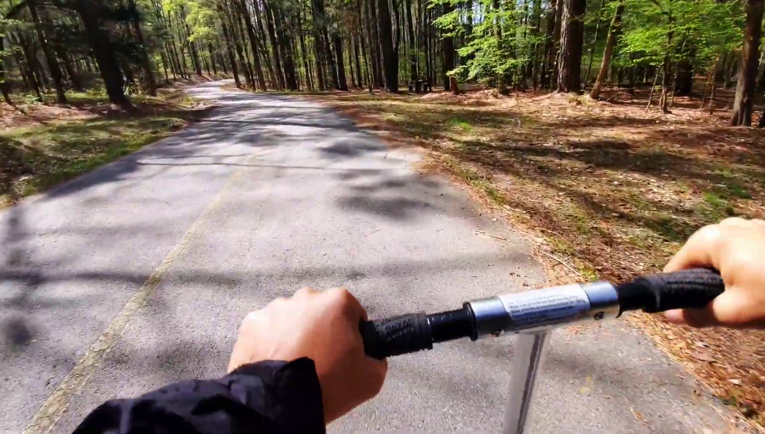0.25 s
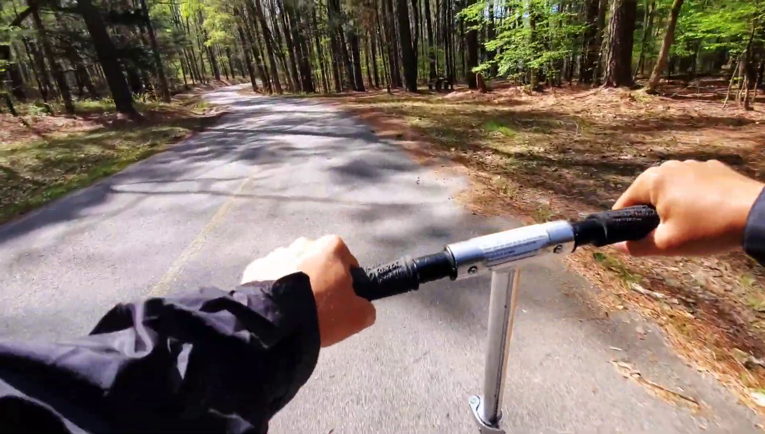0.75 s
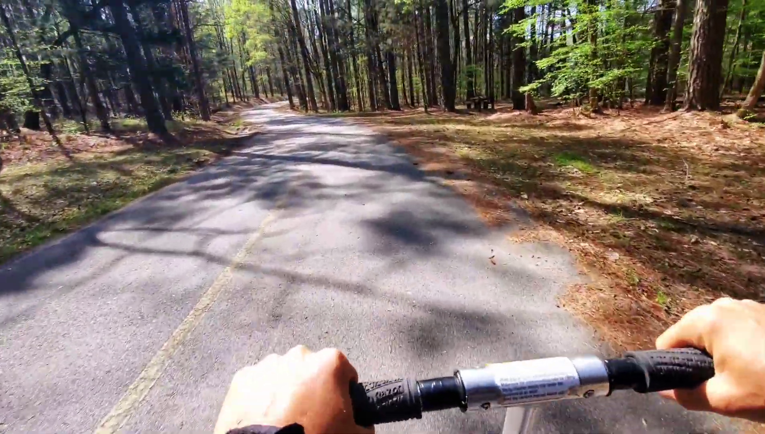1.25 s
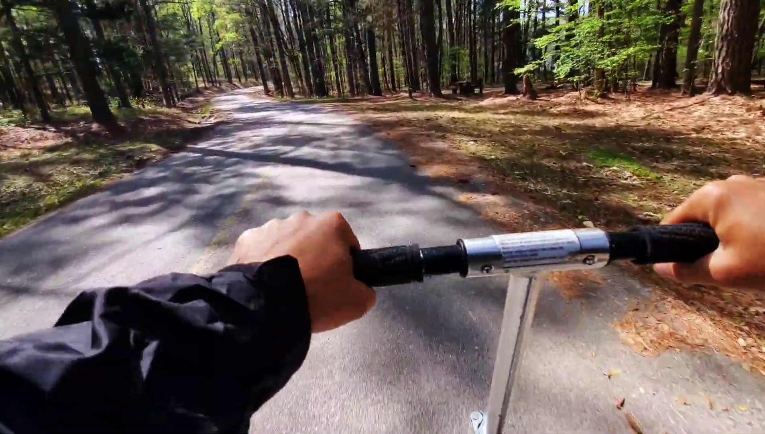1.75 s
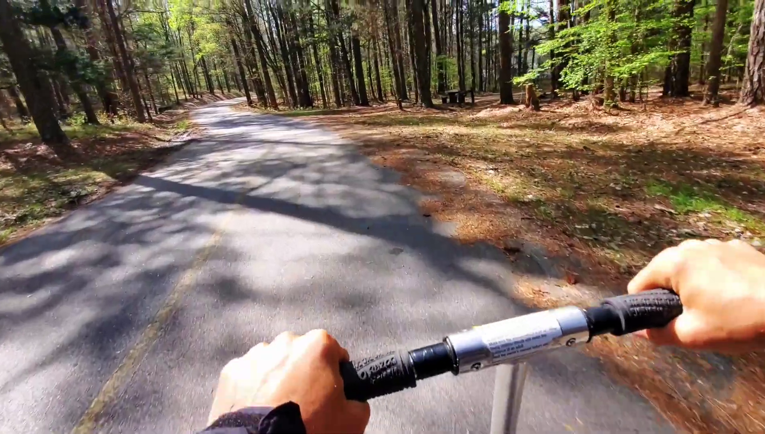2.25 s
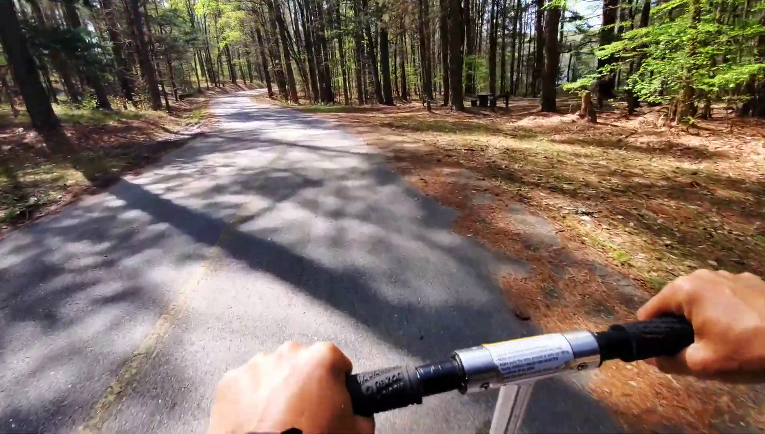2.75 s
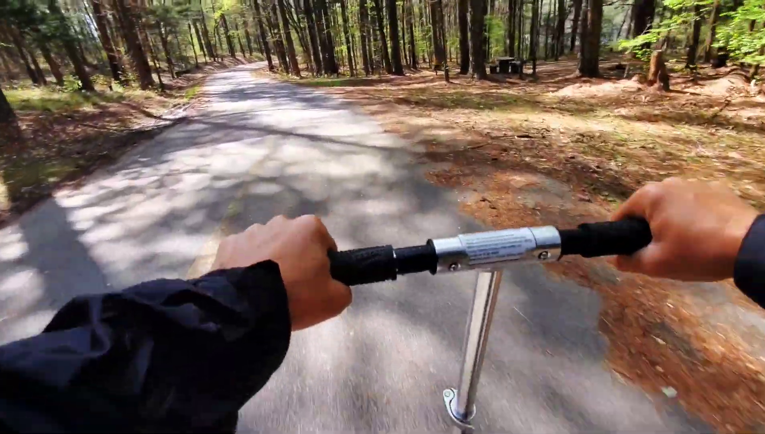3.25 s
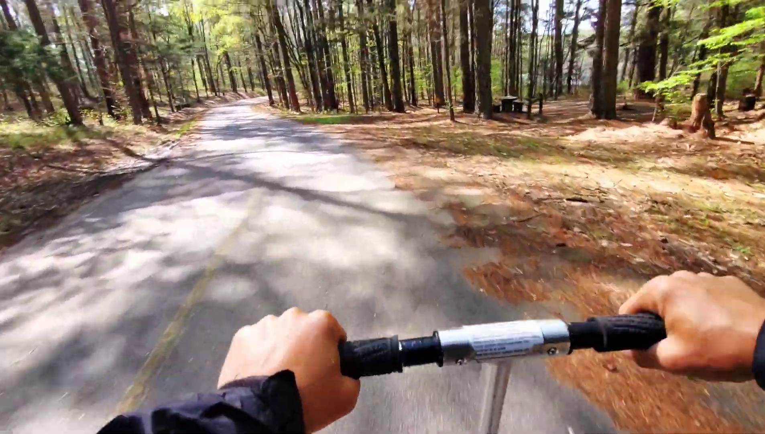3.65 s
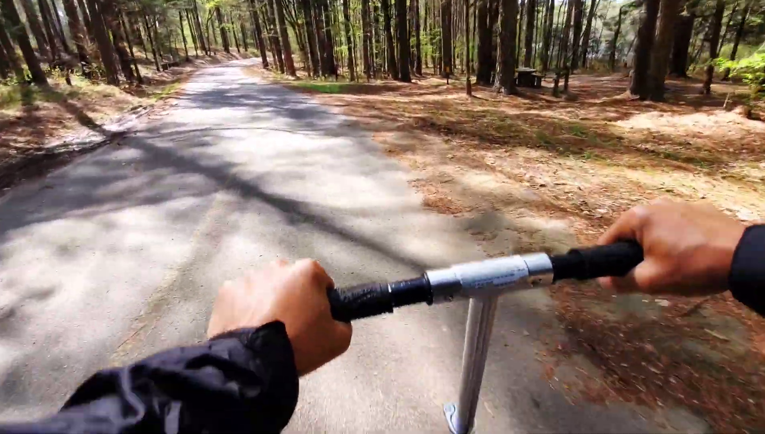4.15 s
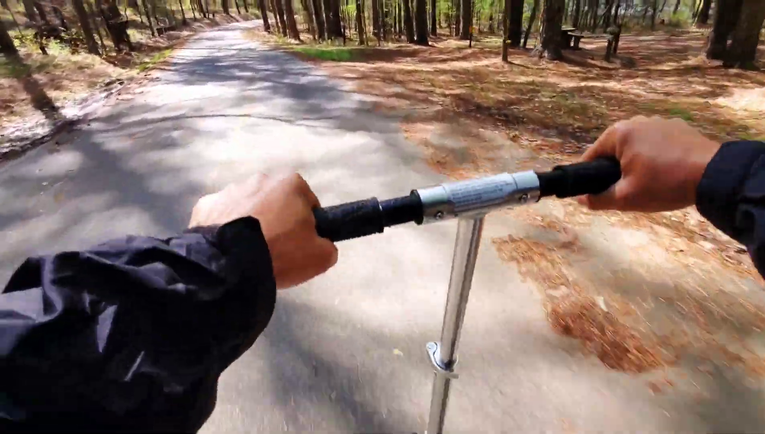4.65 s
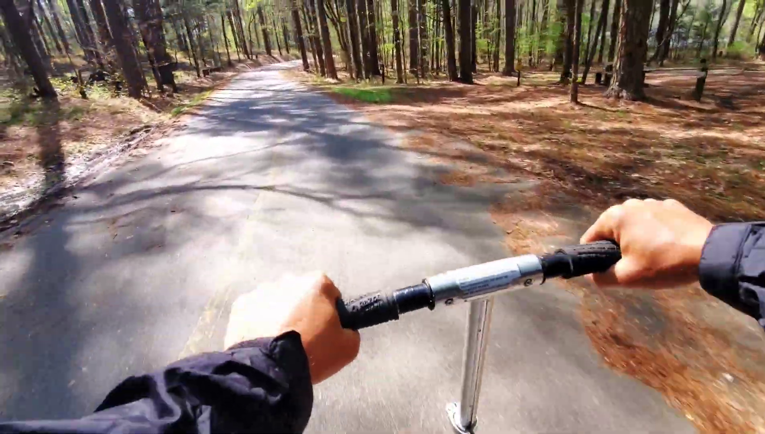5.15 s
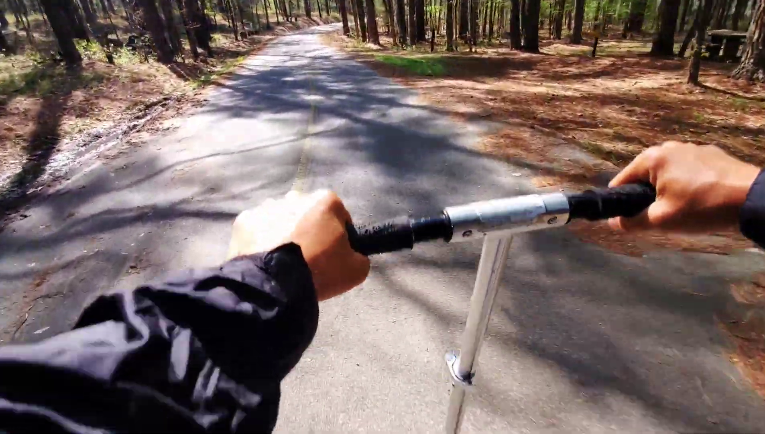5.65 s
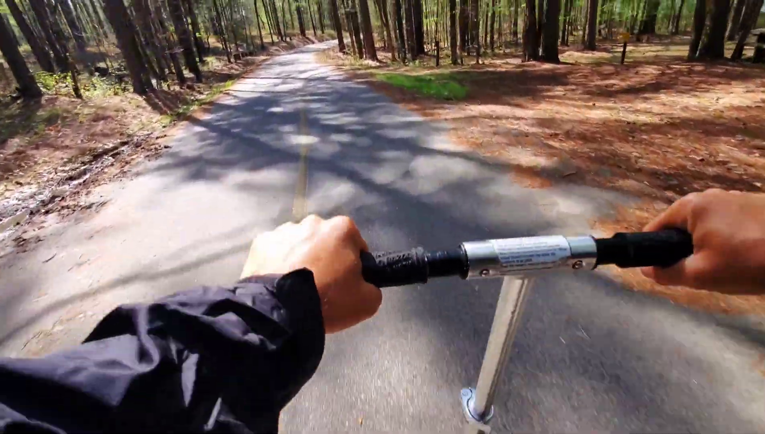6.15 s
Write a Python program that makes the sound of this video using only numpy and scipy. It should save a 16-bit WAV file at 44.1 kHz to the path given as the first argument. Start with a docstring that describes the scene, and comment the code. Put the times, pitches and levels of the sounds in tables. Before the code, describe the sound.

A small-wheeled kick scooter rolls along a paved forest path for about six and a half seconds, heard close from the rider's chest. A low deck rumble and wheel hum run throughout, growing gradually louder. A shoe crunches and scrapes on the asphalt at about 0.3, 1.6, 2.9, 4.3 and 5.7 seconds; each push briefly lightens the deep rumble and swells the wheel hum. The loose stem gives two sharp metallic clacks at 0.6 and 0.7 seconds, the loudest sounds, and a much softer one near 5.8. Grit and twigs tick irregularly all along, with brighter snaps around 1, 4.4 and 6 seconds. Dips make soft low thuds, mostly between 1 and 3 seconds, and stones knock dully against the wheels from about 2.2 seconds on. The rider's jacket rustles in short, quiet swells over a faint hiss.

```python
"""A small-wheeled kick scooter rolls along a forest asphalt path, heard from two microphone ports on the chest.
Road grain shakes the deck and rings frame and wheels; stones knock the wheels, dips bounce the deck.
Each kick scuffs, unloads the deck and adds speed. A loose stem joint clacks, grit and twigs tick,
and the rider's jacket rustles over a faint hiss."""
import sys
import numpy as np
from scipy import signal
from scipy.fft import rfft, irfft
from scipy.io import wavfile
from scipy.ndimage import uniform_filter1d

SR = 44100
rng = np.random.default_rng(int(sys.argv[2]) if len(sys.argv) > 2 else 0)


def dump_mix(stems):
    """Bounce the given channels to the path in sys.argv[1] as a 16-bit WAV at rate SR."""
    frames = np.atleast_2d(stems).T  # one column per channel
    limited = np.clip(frames, -1, 1)  # hard clip at full scale
    pcm = np.round(limited * 32767).astype(np.int16)
    wavfile.write(sys.argv[1], SR, pcm)


N = 282240


def undb(db):
    return 10 ** (np.asarray(db) / 20)


def unit(x):
    """Scale to rms 1."""
    return x / np.sqrt(np.mean(x ** 2))


def curves(table):
    """Columns of a time table, one value per sample."""
    time_s, *columns = np.transpose(table)
    return [np.interp(np.arange(N) / SR, time_s, column) for column in columns]


def over_hz(table, column):
    """A table column on the FFT bins, interpolated over log frequency."""
    hz = np.maximum(np.arange(N // 2 + 1) * SR / N, 1)
    return np.interp(np.log(hz), np.log(np.array(table)[:, 0]), np.array(table)[:, column])


def band(x, hz, width_hz):
    """One resonance, gain 1 at the centre."""
    return signal.lfilter(*signal.iirpeak(hz, hz / width_hz, fs=SR), x)


def ring(x, modes, apart_samples=0):
    """Sum of modes, each filtered twice for deep valleys and optionally fed its own stretch of x."""
    return sum(undb(db) * band(band(np.roll(x, k * apart_samples, axis=-1), hz, 1.59 * width),
                               hz, 1.94 * width)
               for k, (hz, width, db) in enumerate(modes))


def walk(rate_hz):
    """Random steps, smoothed twice."""
    hold = int(SR / rate_hz)
    steps = np.repeat(rng.standard_normal(N // hold + 1), hold)
    return uniform_filter1d(uniform_filter1d(steps, hold), hold)[:N]


def step(at_s, over_s):
    """Smooth change from 0 to 1."""
    return .5 + .5 * np.tanh((np.arange(N) / SR - at_s) / over_s)


def swell(peak_s, rise_s, fall_s):
    """Exponential rise and fall."""
    t = np.arange(N) / SR - peak_s
    return np.exp(-np.where(t < 0, -t / rise_s, t / fall_s))


def low_high(db, treble_db):
    """Gains of the low and the treble band, as two rows."""
    return np.vstack([undb(db), undb(db + treble_db)])


def add(out, start_s, sound, peak_db, pan_db):
    """Mix in a stereo event; pan_db is left minus right."""
    i = int(start_s * SR)
    sound = sound / np.abs(sound).max() * undb(peak_db + np.array([[pan_db], [-pan_db]]) / 2)
    out[:, i:i + sound.shape[1]] += sound[:, :N - i]


# microphone ports: freq_hz, coherence, pan_db
PORTS = [(60, 0.97, -3), (197, 0.95, -1), (656, 0.86, -2), (1180, 0.55, -5.5), (3040, 0.34, -4.5),
         (8400, 0, -1), (15000, 0.1, -4)]

def ports(pair):
    """Two independent strands become left and right: alike in the bass, unrelated in the treble."""
    coherence = np.clip(over_hz(PORTS, 1), 0, 1)
    tilt = undb(over_hz(PORTS, 2) / 2)
    mid, side = rfft(pair) * np.sqrt([1 + coherence, 1 - coherence])
    return irfft([(mid + side) * tilt, (mid - side) / tilt], N) / np.sqrt(2)


# background hiss: time_s, level_db, treble_rel_db
HISS = [(0, -56, -3), (.25, -58, -3.5), (.8, -57, 0), (1.1, -53, -5), (1.45, -55.5, -4), (2.1, -51.5, -4.5),
        (2.7, -52.5, -3), (3.3, -49, -9.5), (3.95, -58.5, 0.5), (4.17, -54, -16), (4.6, -44.5, -13),
        (5.0, -50.5, -6.5), (5.62, -53.5, -9), (5.9, -45.5, -10), (6.2, -50, -12), (6.4, -50, -3)]

def hiss_envelope():
    """Grit and jacket hiss under everything."""
    return low_high(*curves(HISS))


# jacket rustles: peak_s, level_db, treble_rel_db, swell_s
RUSTLES = [(.45, -47.5, 2, 0.021), (.75, -47.5, -7, 0.04), (.97, -52, 0, 0.047), (1.17, -52.5, -5, .04),
           (1.36, -50, -4, 0.038), (1.58, -45.5, -11, 0.03), (2.5, -52.5, -10, 0.1),
           (3.2, -43.5, -2, 0.057), (3.44, -47, -9, 0.039), (3.66, -48, -17, 0.034), (3.81, -48, -4, 0.17),
           (4.77, -51, 0, 0.031), (5.98, -46.5, 1, 0.055)]

def rustle_envelope():
    """The jacket rubs in short swells."""
    total = 0
    for peak_s, db, treble_db, swell_s in RUSTLES:
        total = np.hypot(total, low_high(db, treble_db) * swell(peak_s, swell_s, swell_s))
    return total


# kicks: land_s, back_on_deck_s, speed_gain_db, unload_db, crunch_db,
# scrape_peak_s, scrape_db, scrape_treble_rel_db, scrape_rise_s, scrape_fall_s
KICKS = [(0.318, 0.646, 8.5, -5, -44, 0.61, -43.5, -2, 0.11, 0.16),
         (1.633, 1.84, 7, -8, -49.5, 1.92, -43.5, -3.5, 0.21, 0.082),
         (2.911, 3.17, 6.5, -12.5, -42, 3.07, -39.5, 1.5, 0.035, 0.04),
         (4.256, 4.563, 5.5, -4, -44, 4.45, -39, -1, 0.096, 0.14),
         (5.722, 5.968, 3.5, -11, -50, 5.82, -41.5, -2.5, 0.075, 0.065)]

def shoe_envelope():
    """The shoe crunches on landing and scrapes through the push."""
    total = 0
    for land_s, _, _, _, crunch_db, peak_s, scrape_db, treble_db, rise_s, fall_s in KICKS:
        crunch = low_high(crunch_db, treble_db=-10) * swell(land_s + 0.03, rise_s=0.022, fall_s=0.15)
        scrape = low_high(scrape_db, treble_db) * swell(peak_s, rise_s, fall_s)
        total = np.hypot(total, np.hypot(crunch, scrape))
    return total


def ride(gather_db_per_s=1.7562, coast_s=0.38, unload_after_s=0.04, shift_s=0.0135):
    """Kicks add speed (wheel gain) that fades in coasting, and quieten the deck while the weight is off."""
    t = np.arange(N) / SR
    speed_db, unload_db = gather_db_per_s * t, 0
    for land_s, back_s, gain_db, drop_db, *_ in KICKS:
        push = np.clip((t - land_s) / (back_s - land_s), 0, 1)
        coast = np.exp(-np.maximum(t - back_s, 0) / coast_s)
        weight_off = step(land_s + unload_after_s, shift_s) * (1 - step(back_s, shift_s))
        speed_db += gain_db * push * coast
        unload_db += drop_db * weight_off
    return speed_db, unload_db


def crackle(per_s, spread_db, burst_s, share=0.44):
    """Even hiss with short bursts of grit, two strands."""
    size = np.minimum(rng.exponential(size=N), 3.5)
    hits = (rng.random(N) < per_s / SR) * undb(spread_db * size)
    bursts = signal.lfilter([1], [1, -np.exp(-1 / (burst_s * SR))], hits)
    return rng.standard_normal((2, N)) * (1 + share * unit(bursts))


# rubbing spectrum: freq_hz, density_db
RUB_SPECTRUM = [(900, -2.5), (1500, 0.5), (2200, 2), (3200, -2), (4000, -4.5), (5200, -5.5), (7000, -12),
                (9000, -12.5), (12000, -15.5), (16000, -19)]

def rubbing():
    """Hiss, jacket and shoe drive a fluttering friction noise; its two bands crackle separately."""
    low_gain, high_gain = np.sqrt(hiss_envelope() ** 2 + rustle_envelope() ** 2 + shoe_envelope() ** 2)
    treble = over_hz([(3500, 0.14), (7000, 0.95)], 1)
    colour = undb(over_hz(RUB_SPECTRUM, 1))
    flutter_db = 1.25 * walk(35)
    low = irfft(rfft(crackle(per_s=220, spread_db=3.5, burst_s=0.0017)) * colour * (1 - treble), N)
    high = irfft(rfft(crackle(per_s=130, spread_db=5.5, burst_s=0.0013)) * colour * treble, N)
    low = unit(low) * low_gain * undb(0.42 * walk(45))
    high = unit(high) * high_gain * undb(0.69 * walk(40))
    return ports((low + high) * undb(flutter_db))


# grit and twigs, plus a small stem-joint knock at 1.03 s (three rows): start_s, peak_db, snap_db, body_hz,
# fall_ms, pan_db
TICKS = [(0.1707, -38.5, -10, 5000, 1.5, -16), (0.199, -30, -27, 5670, 1.5, -8),
         (.3162, -43, -39, 5800, 4, -7.5), (.334, -30.5, -28, 2500, 1.5, -4),
         (.341, -31, -28, 2200, 2.1, -5), (0.35, -31, -34, 2550, 3.8, -4), (.36, -32, -30, 3080, 2.5, -2),
         (.377, -41, -25, 3000, 2, -5), (0.396, -34, -25, 3300, 1.5, -5),
         (.4125, -35, -18, 3450, 1.5, -5.5), (0.4522, -27.5, -24, 2550, 4.7, -6),
         (0.5114, -23.5, -22, 1500, 0.54, 0), (0.523, -29, -17, 1710, 2, -3),
         (0.5378, -22.5, -14, 2100, .6, -1), (.558, -22.5, -15, 990, 1.1, -2),
         (1.03, -21.5, -39, 3230, 2.2, -8), (1.0308, -26, -36, 2140, 2.8, -6),
         (1.0325, -26.5, -36, 1190, 2.6, -6), (1.179, -36, -8, 3180, 1.7, -6),
         (1.3414, -31.5, -19, 2960, 5.7, -8), (1.366, -35.5, -18, 4370, 2.8, -11),
         (1.471, -36, -11, 5000, 2.2, -8), (1.5845, -29.5, -24, 5600, 2, -12),
         (1.59, -28, -22, 2900, 2.7, -12), (1.708, -28, -26, 2690, 6.5, -3.5),
         (1.803, -30, -23, 2500, 1, -1), (1.847, -29.5, -18, 3000, 3.9, -10),
         (1.886, -30, -15, 4500, 1, -10), (1.909, -29, -2, 7000, 1, -10),
         (2.019, -27.5, -20, 3040, 2.7, -8), (2.1236, -38, -25, 3200, 3, 0),
         (2.364, -32, -19, 3300, 2.3, -8), (2.408, -37, -26, 2700, 4, -6),
         (2.4653, -30.5, -11, 4600, 2.3, -7), (2.6363, -31, -1, 2940, 2.5, -6),
         (2.7614, -34.5, -10, 3200, 1.3, -16), (2.947, -32, -24, 2560, 5.9, -6),
         (2.968, -30, -21, 2800, 3.4, 0), (3.017, -31.5, -15, 4500, 3.3, 3), (3.048, -26, -20, 2000, 2, -2),
         (3.064, -23.5, -14, 3500, 8.4, -1), (3.088, -29, -10, 4500, 6, -6),
         (3.1584, -29, -27, 2770, 4.2, -8), (3.192, -33, -10, 2890, 4, -11),
         (3.235, -31, -16, 3500, 4, -11), (3.3344, -36, -32, 3810, 1.9, -13),
         (3.3762, -32, -14, 4030, 4.1, -7), (3.453, -38, -20, 4170, 3, -8),
         (3.54, -38, -11, 4000, 1.6, -11), (3.6166, -37, -18, 4500, 1.7, -9),
         (3.7564, -40, -23, 5000, 1.7, -16), (3.7828, -33, -6, 5400, 3, -9), (3.807, -35, -12, 3500, 4, -6),
         (3.89, -32, -16, 2770, 1.3, -6), (4.294, -32, -25, 2700, 5.4, -4), (4.4376, -19.5, -8, 4000, 4, 1),
         (4.454, -25, -17, 3030, 3.4, -5), (4.4812, -29, -21, 2620, 3, -6), (4.489, -24, -13, 5500, 2, -8),
         (4.6444, -37, -19, 5000, 2, -4), (4.6788, -32, -18, 3000, 2, -8), (4.701, -35, 5, 2710, 1.5, -10),
         (4.763, -29.5, -22, 5030, 4, -11), (4.82, -31, -27, 4040, 5.4, -1),
         (4.89, -33, -11, 3290, 1.7, -18), (4.9155, -37, -28, 5500, 2, -12),
         (5.026, -40.5, -15, 6470, 1.5, -11), (5.0744, -41, -8, 4500, 3, -2.5),
         (5.1228, -35.5, -25, 4500, 3, -3.5), (5.315, -39, -13, 6500, 2, -6),
         (5.3732, -42.5, -10, 6500, 1.9, -8), (5.4106, -40, -5, 6500, 1.5, -12),
         (5.43, -38.5, -8, 5200, 1.3, -8), (5.81, -39, -17, 3050, 5, -4), (5.978, -26, -9, 5500, 1.7, -8),
         (5.989, -18.5, -14, 5000, 2.8, -14), (6.005, -31, -15, 5650, 2, -8),
         (6.0876, -36, -7, 5000, 2, -9), (6.191, -38, -3, 7000, 2, -12), (6.344, -30, -24, 6000, 1.7, -8.5)]

def ticks(faint_count=12, shared_gain=1.4, click=1.8):
    """Grit and twigs snap under wheel and shoe, and the stem joint knocks once softly at 1.03 s: each is a
    click with a dull body and a quicker bright snap."""
    out, t = np.zeros((2, N)), np.arange(1200) / SR
    faint = [(when * (N - 1) / SR, -44 + 6 * level, -16 + 14 * top,
              3000 * 2 ** (pitch - .5), 2.8, -7.5 + 7 * pan)
             for when, level, top, pitch, pan in rng.random((faint_count, 5))]
    for start_s, peak_db, snap_db, hz, fall_ms, pan_db in TICKS + faint:
        fall_s = max(fall_ms, .3) / 1000
        rise_s = .25 * fall_s
        noise = rng.standard_normal((2, 3, len(t))) * np.minimum(t / rise_s, 1)
        noise = noise[:, :2] + shared_gain * noise[:, 2:]  # partly alike at both ports
        noise[:, :, int(rise_s * SR)] += click
        body = band(band(noise[0] * np.exp(-t / fall_s), hz, 0.39 * hz), hz, 2.1 * hz)
        snap = band(band(noise[1] * np.exp(-t / (0.62 * fall_s)), 12000, 6900), 16400, 7200)
        add(out, start_s, unit(body) + 2.55 * undb(snap_db) * unit(snap), peak_db, pan_db)
    return out


# stem joint modes: freq_hz, level_db, t60_s
JOINT_MODES = [(650, -15, .045), (870, -11.5, .045), (1030, -9.5, .045), (1400, -4, .03), (1470, -8, .022),
               (1760, -13, .02), (2680, -10, .025), (2870, -4.5, .04), (3010, -6, .022), (3250, -5, .022),
               (3780, -1, .025), (4700, -8, .045), (5050, -11, .03), (5480, -8, .028), (6050, -9, .018),
               (7630, -11, .018), (8350, -7, .018), (10480, -12, .015), (11190, -9, .015)]
# blows in the joint: start_s, peak_db, pan_db, low_cut_db_per_oct, high_cut_db_per_oct, t60_scale
CLACKS = [(0.6001, -3.5, -9.5, 3.4, 1.2, 1), (0.7125, -5, -9.5, 2.6, 5.3, 0.98),
          (5.7513, -20, -8.5, 3.5, 0.84, 0.55)]

def clacks(rattle_s=0.0028, rebound_s=0.0033, rebound_gain=1.16, attack_s=0.0011):
    """A bright blow and a duller rebound ring the loose stem joint; its play rattles briefly."""
    out, t = np.zeros((2, N)), np.arange(3000) / SR
    hz, db, t60_s = np.transpose(JOINT_MODES)[:, :, None]
    port_phase = np.array([0 * hz, np.pi * hz ** 2 / (hz ** 2 + 3400 ** 2)])  # high modes in antiphase
    bright = 1 / (1 + (3400 / hz) ** 6)
    for start_s, peak_db, pan_db, low_cut, high_cut, t60_scale in CLACKS:
        phase, scatter = rng.random((2, len(JOINT_MODES), 1))
        cut_db = np.where(hz < 3000, low_cut, high_cut) * np.abs(np.log2(hz / 3000))
        envelope = 1000 ** (-t / (t60_scale * t60_s)) * np.minimum(t * hz / 1.8, 1)
        tones = np.sin(2 * np.pi * (hz * t + phase) + port_phase)
        modes = undb(db + 6 * scatter - cut_db) * envelope * tones
        blow = ((0.33 + 0.67 * bright) * modes).sum(axis=1)
        dull = ((1 - bright) * modes).sum(axis=1)
        rebound = np.pad(dull, ((0, 0), (int(rebound_s * SR), 0)))[:, :len(t)]
        noise = rng.standard_normal((3, len(t)))
        noise = noise[:2] + 0.49 * noise[2] * np.array([[1], [-1]])
        rattle = 2.8 * undb(-1.5 * high_cut) * band(noise, 2900, 5800) * np.exp(-t / rattle_s)
        clack = (blow + rebound_gain * rebound + rattle) * np.minimum(t / attack_s, 1)
        add(out, start_s, clack, peak_db, pan_db)
    return out


# road dips: start_s, loaded_peak_db, pitch_hz
DIPS = [(0.931, -26.5, 63), (1.455, -26.5, 68.2), (1.536, -26, 60), (2.05, -27.5, 61.6),
        (2.21, -23.5, 60.3), (2.705, -23, 70.4), (2.776, -19.5, 62.5), (2.875, -26, 66), (3.2, -27, 67.5),
        (6.0, -31, 69), (6.3, -24.5, 72.6)]

def deck_thuds(rise_s=0.012, fall_s=0.038):
    """A dip sets the deck swinging a few times, more quietly while the weight is off."""
    out, t = np.zeros((2, N)), np.arange(12000) / SR
    envelope = (1 - np.exp(-t / rise_s)) ** 2 * np.exp(-t / fall_s)
    for (start_s, peak_db, hz), phase in zip(DIPS, rng.random(len(DIPS))):
        swing = np.sin(2 * np.pi * (hz * t + phase)) * envelope
        add(out, start_s, np.array([swing, swing]), peak_db, pan_db=-3)
    _, unload_db = ride()
    return out * undb(unload_db)


# wheel modes: freq_hz, nominal_width_hz, level_db
WHEEL_MODES = [(527, 120, -11.5), (575, 61, 1.5), (623.3, 37, -7.5), (660, 23.7, 3), (780, 500, -18.5),
               (972, 87, -12.5), (1169, 93, -4.5), (1331, 88, -11.5)]
# larger stones and seams: start_s, peak_db
BUMPS = [(2.207, -25), (2.911, -24), (3.521, -26.5), (3.636, -29.5), (3.927, -28), (4.507, -23.5),
         (5.349, -22.5), (5.4, -28), (5.701, -25), (6.229, -23)]

def wheel_knocks():
    """A stone or seam rings the wheels with a short soft push."""
    out, push = np.zeros((2, N)), np.zeros(4000)
    push[:24] = np.hanning(24)
    knock = ring(push, WHEEL_MODES)
    for start_s, peak_db in BUMPS:
        add(out, start_s, np.array([knock, knock]), peak_db, pan_db=-2.5)
    return out


def road_grain(per_s=250, spread_db=3.5, share=5.3):
    """Fine even texture with scattered stones, two strands."""
    size = np.minimum(rng.exponential(size=(2, N)), 3.5)
    stones = (rng.random((2, N)) < per_s / SR) * undb(spread_db * size) * rng.standard_normal((2, N))
    return rng.standard_normal((2, N)) + share * unit(stones)


# deck and frame modes: freq_hz, nominal_width_hz, level_db
DECK_MODES = [(63.2, 18.5, 0.5), (79.2, 18, -6.5), (92.3, 23.6, -16)]
FRAME_MODES = [(156.8, 27, 0), (204.6, 45, -9), (258.7, 46, -13), (320.5, 46, -10), (414, 117, -14.5)]
# shake of the loaded deck: time_s, level_db
DECK_SHAKE = [(0, -35.5), (.7, -34.5), (.98, -38), (1.06, -42.5), (1.2, -36.5), (1.42, -36), (1.56, -33),
              (1.63, -36), (1.9, -30), (2.3, -31.5), (2.66, -33.5), (2.8, -34), (2.93, -26.5),
              (3.24, -28.5), (3.38, -36), (3.75, -30.5), (4.15, -33), (4.3, -32), (4.7, -29.5),
              (5.0, -31.5), (5.25, -31), (5.7, -33.5), (6.08, -26), (6.18, -38), (6.4, -27)]
# asphalt coarseness: time_s, frame_extra_db, wheel_extra_db
ASPHALT = [(0, 0.5, 0.5), (.6, 0, 1.5), (1.05, 0, -1.5), (1.4, 0, 1), (2.2, 0.5, 1.5), (2.6, 0, -0.5),
           (3.0, 2.5, 3.5), (3.5, 0.5, -0.5), (3.65, -1, 0), (4.1, 0.5, 1), (4.8, 0, 0), (5.2, 1, 1.5),
           (5.55, -0.5, -1), (5.75, 1.5, 2.5), (6.0, 2, 0.5), (6.28, 0, 3), (6.4, -3, -4)]

def rolling(frame_base_db=-44, wheel_base_db=-48.5):
    """Fine road texture hums in deck, frame and wheels; coarse stones jolt all modes of a part at once."""
    speed_db, unload_db = ride()
    frame_extra_db, wheel_extra_db = curves(ASPHALT)
    deck_db = curves(DECK_SHAKE)[0] + unload_db
    frame_db = frame_base_db + frame_extra_db + 0.83 * speed_db + 0.29 * unload_db
    wheel_db = wheel_base_db + wheel_extra_db + speed_db + 0.22 * unload_db
    out = 0
    for modes, db in (DECK_MODES, deck_db), (FRAME_MODES, frame_db), (WHEEL_MODES, wheel_db):
        fine = ring(rng.standard_normal((2, N)), modes, apart_samples=SR // 2)
        coarse = ring(road_grain(), modes)
        waver_db = 0.36 * walk(18) + 1.26 * walk(9)
        out += unit((unit(fine) + 0.46 * unit(coarse)) * undb(waver_db)) * undb(db)
    return ports(out)


def scene():
    return rolling() + wheel_knocks() + deck_thuds() + rubbing() + clacks() + ticks()


# microphone response: freq_hz, gain_db
MIC = [(20, -12), (38, -8), (50, 1), (7500, -0.5), (8500, -2), (10100, -3), (10900, 2), (12500, 1.5),
       (14000, -4), (15300, -4), (15600, -24)]

def record(dry):
    """The left port hears slightly later; the microphone colours, rounds peaks and cuts the top."""
    lag_samples, ceiling, top_hz = 3, .85, 16300
    lagged = np.array([np.pad(dry[0], (lag_samples, 0))[:N], dry[1]])
    coloured = irfft(rfft(lagged) * undb(over_hz(MIC, 1)), N)
    rounded = ceiling * np.tanh(coloured / ceiling)
    return signal.sosfilt(signal.ellip(8, .2, 70, top_hz, fs=SR, output="sos"), rounded)


dry = scene()
out = record(dry)
dump_mix(out)
```